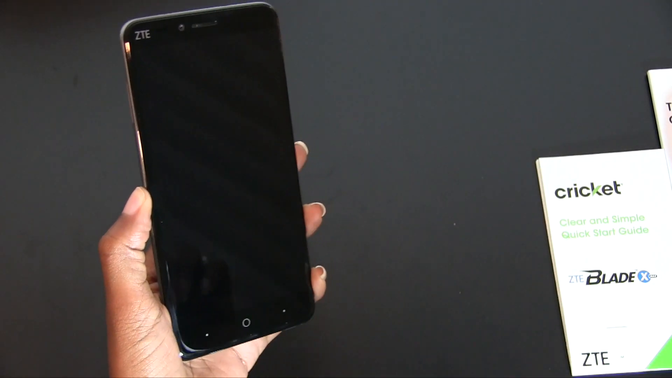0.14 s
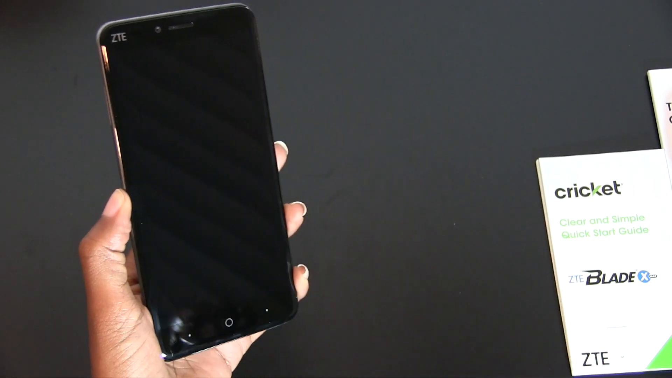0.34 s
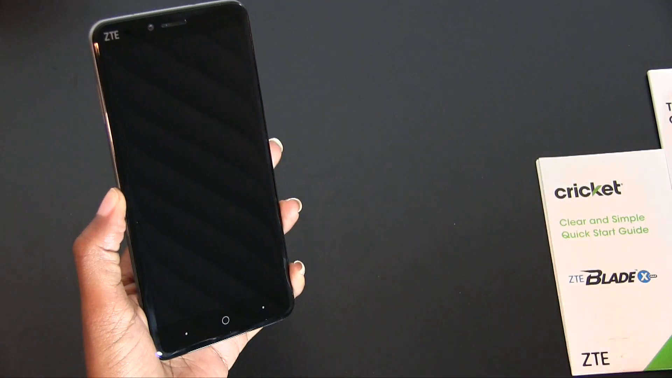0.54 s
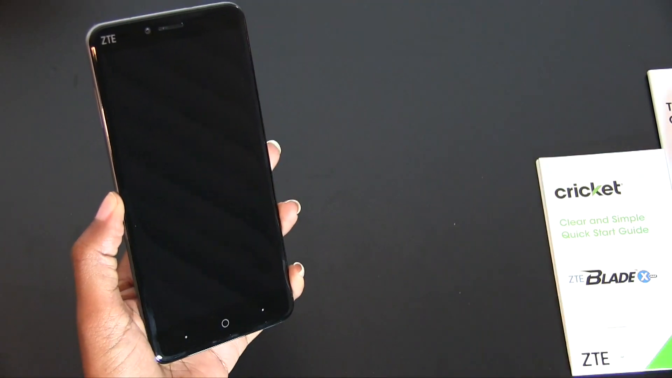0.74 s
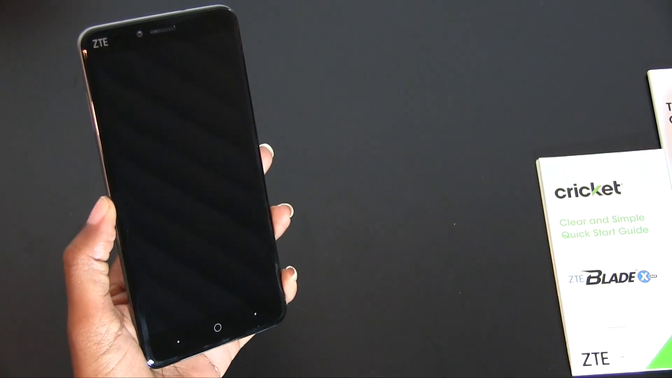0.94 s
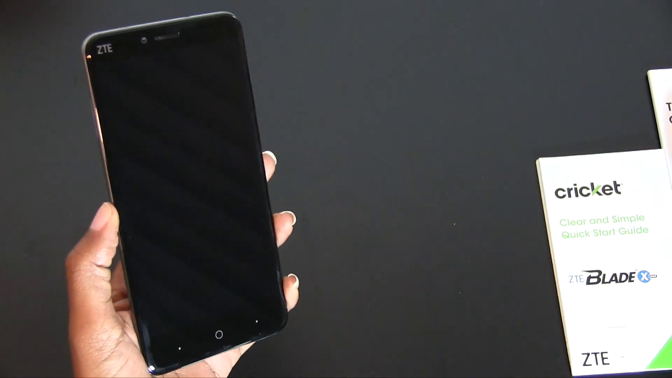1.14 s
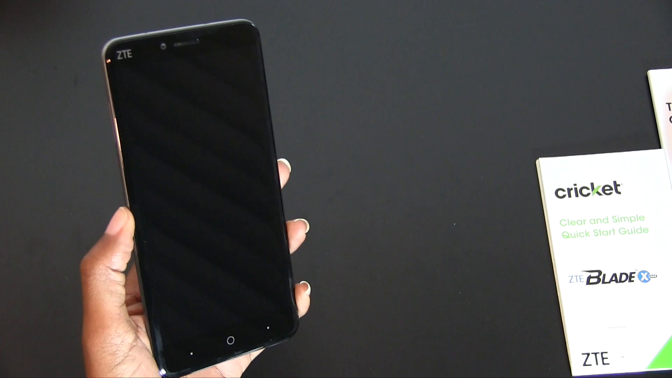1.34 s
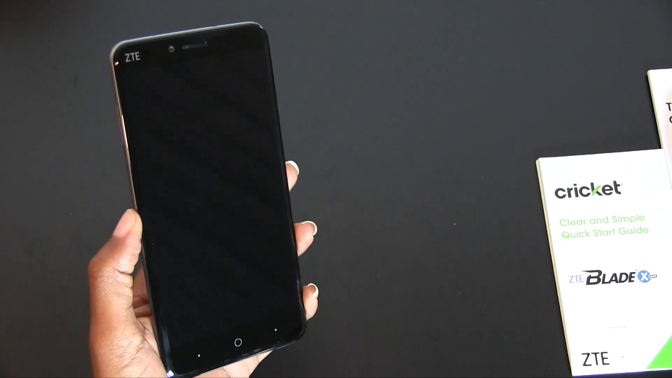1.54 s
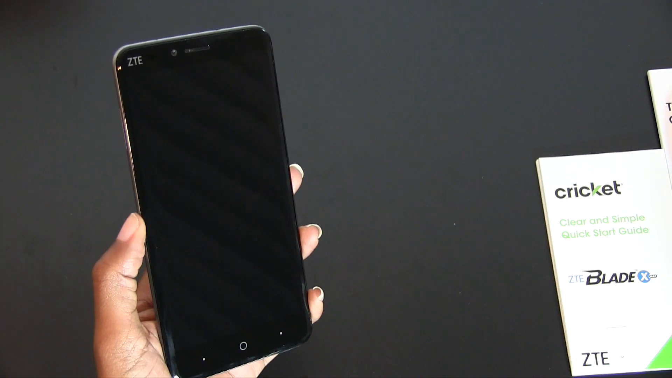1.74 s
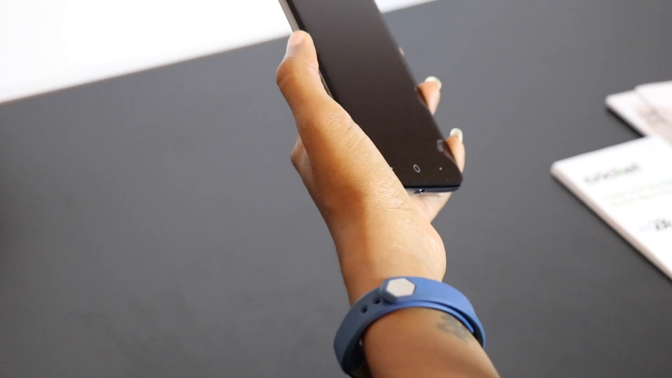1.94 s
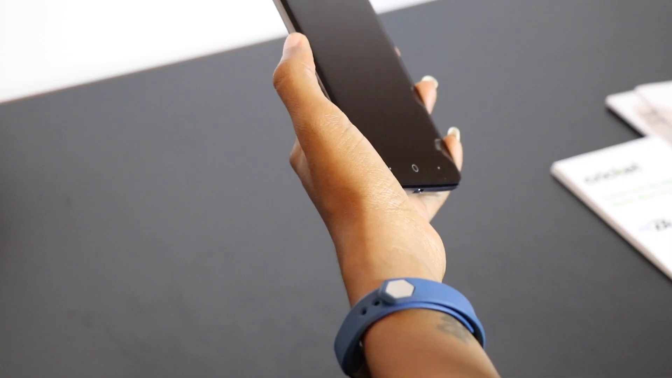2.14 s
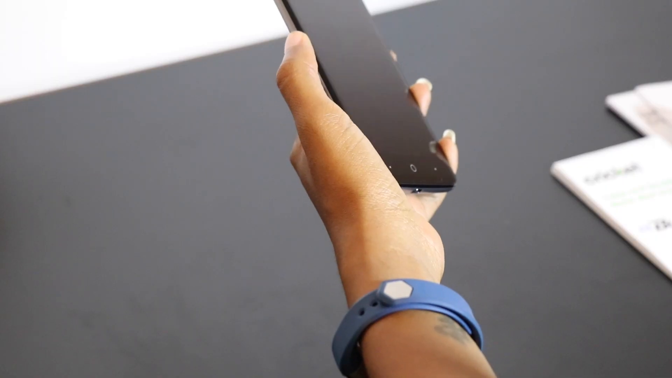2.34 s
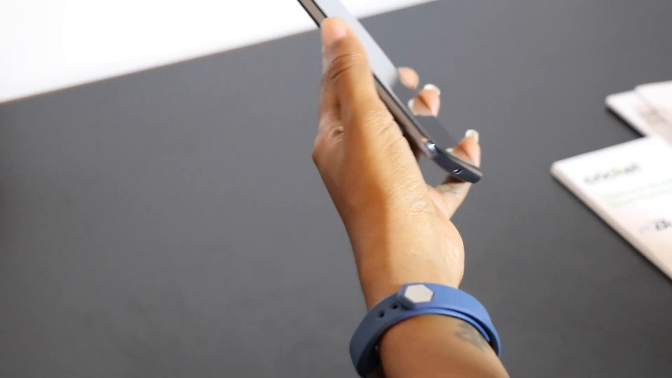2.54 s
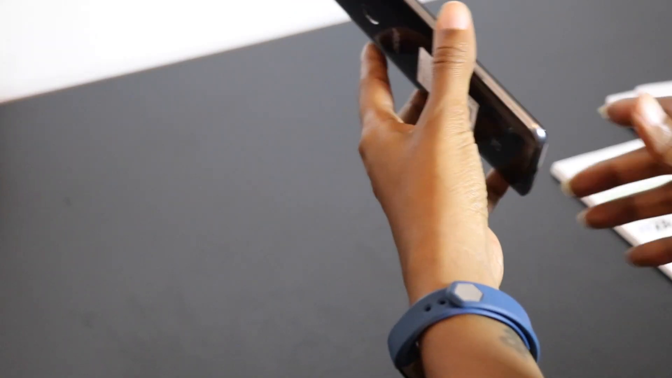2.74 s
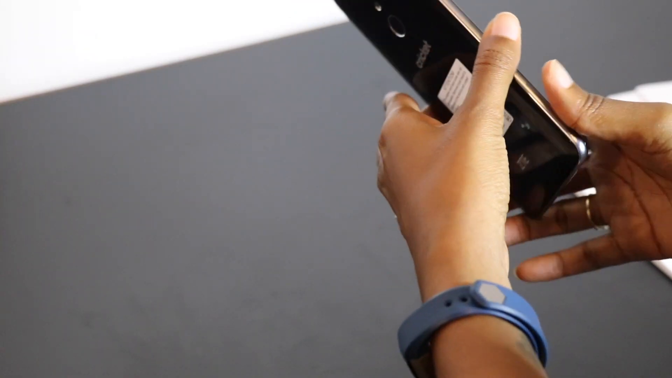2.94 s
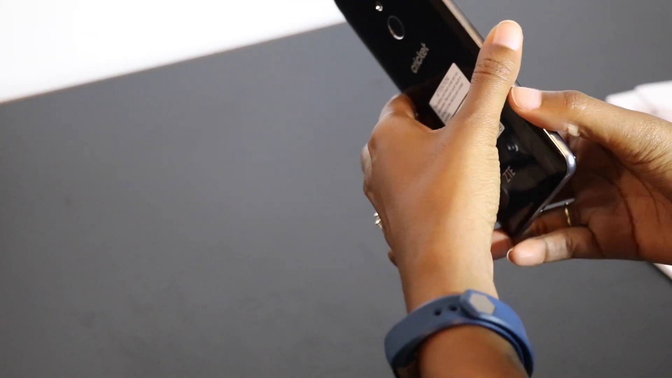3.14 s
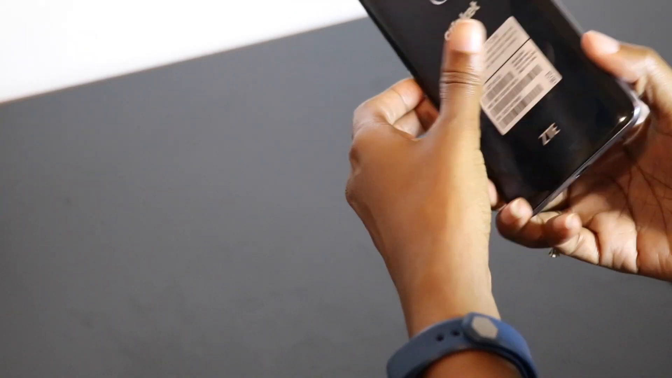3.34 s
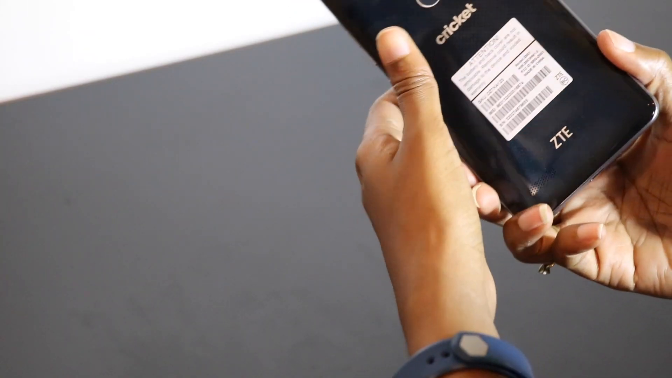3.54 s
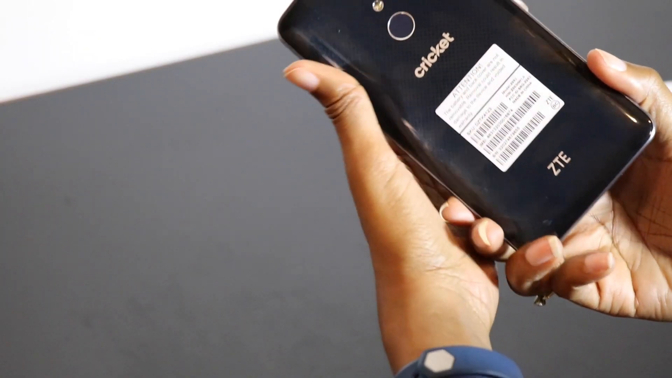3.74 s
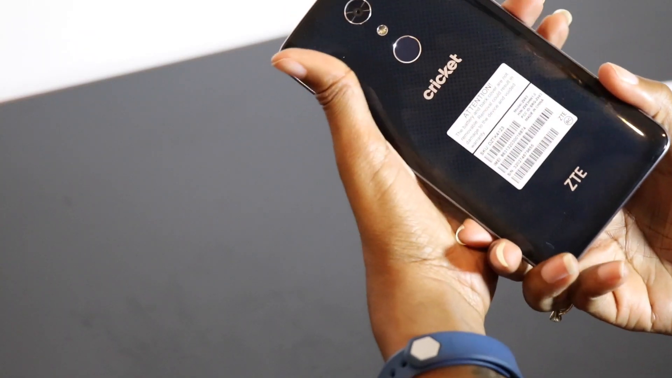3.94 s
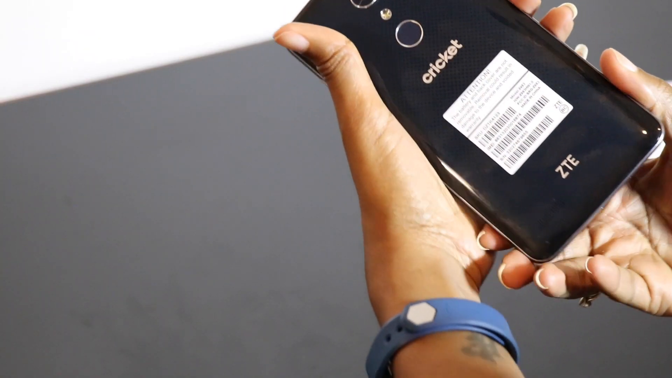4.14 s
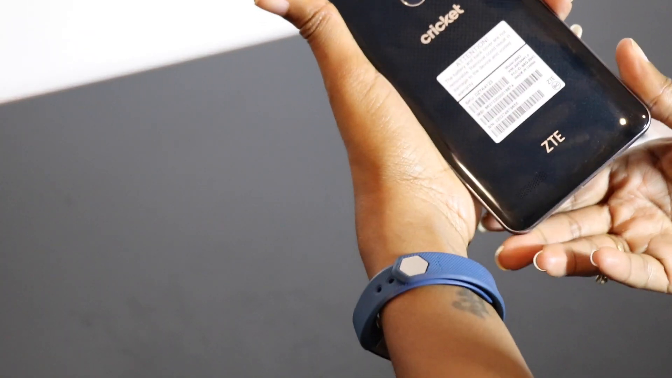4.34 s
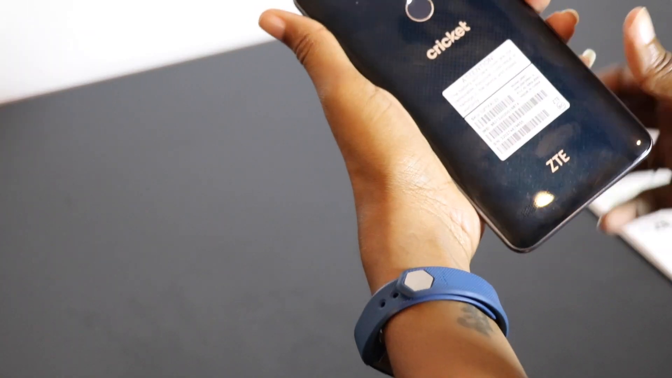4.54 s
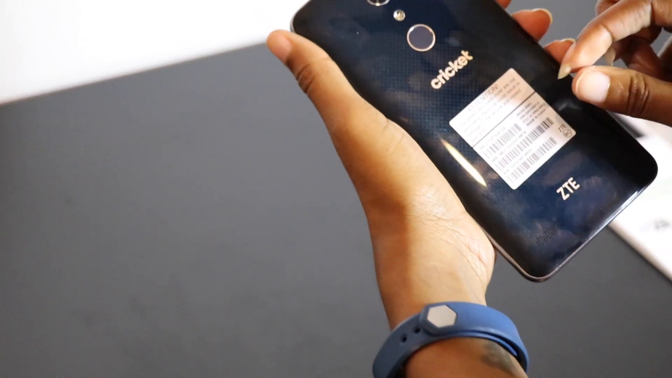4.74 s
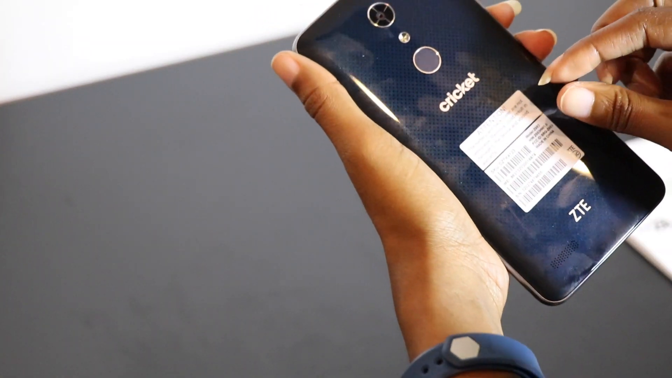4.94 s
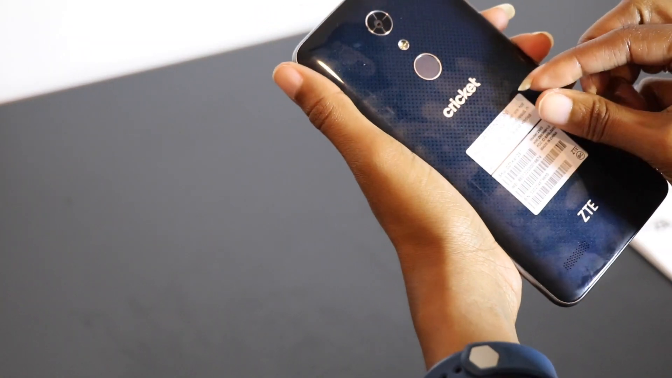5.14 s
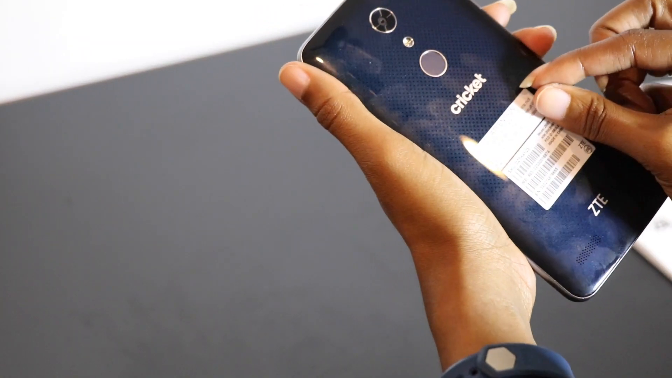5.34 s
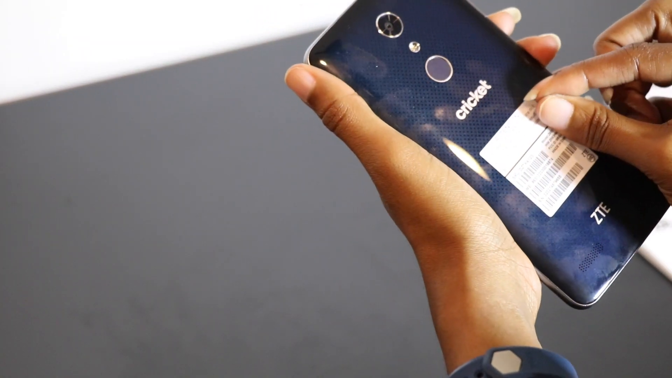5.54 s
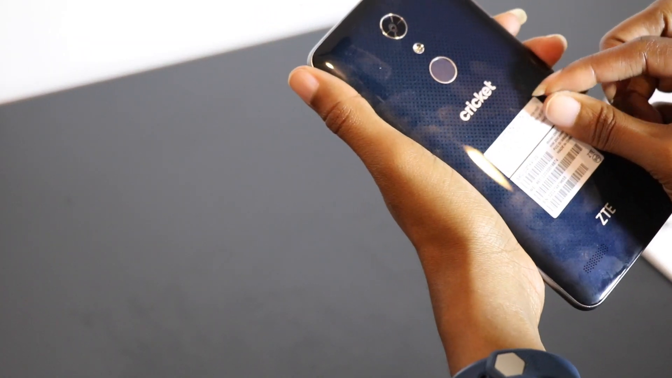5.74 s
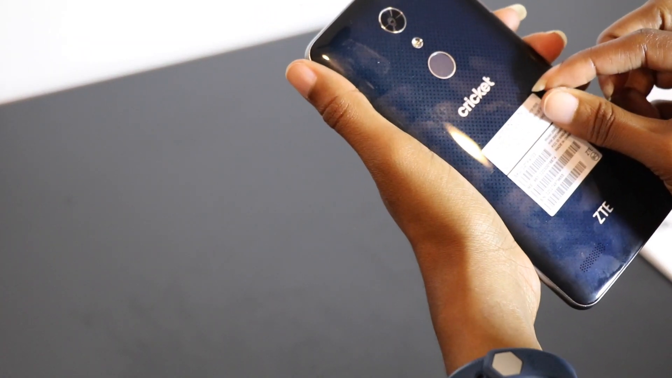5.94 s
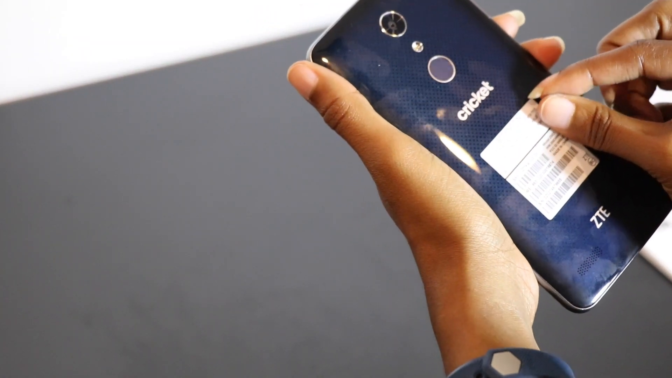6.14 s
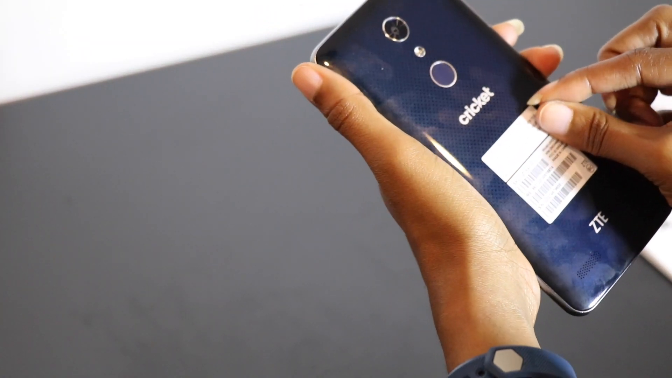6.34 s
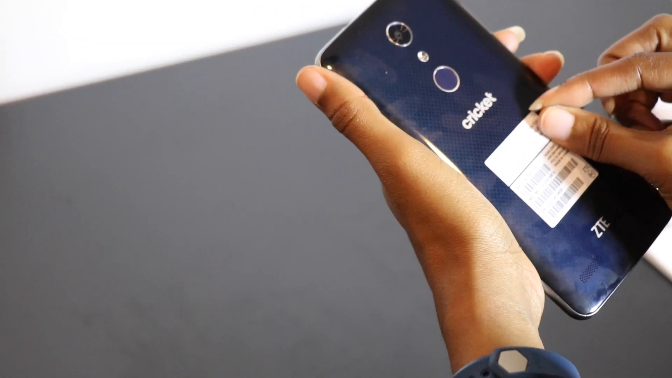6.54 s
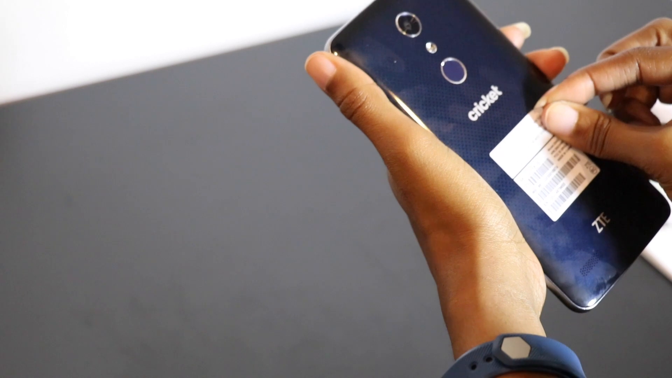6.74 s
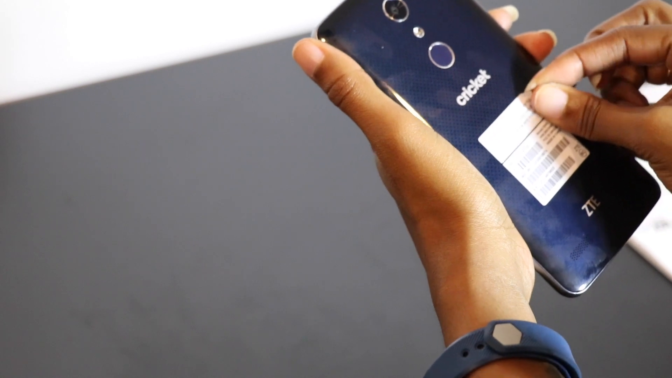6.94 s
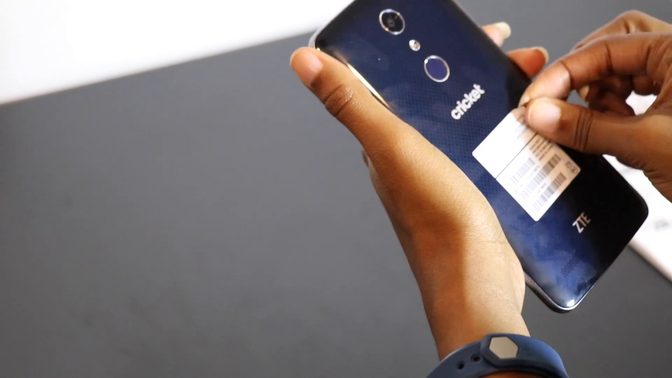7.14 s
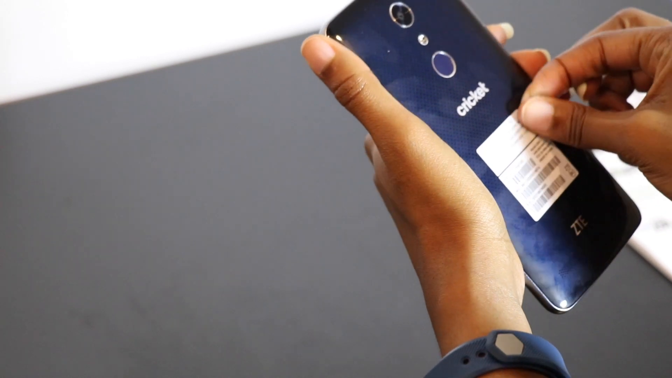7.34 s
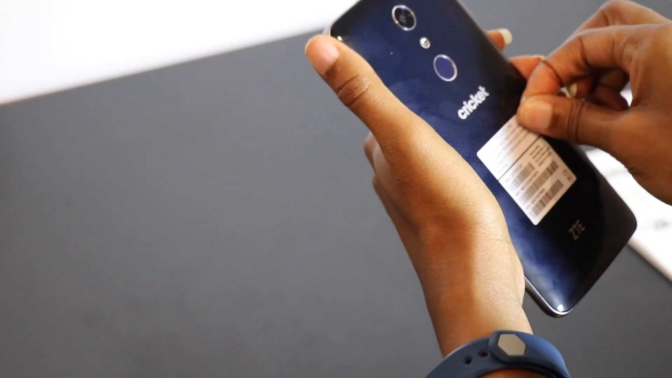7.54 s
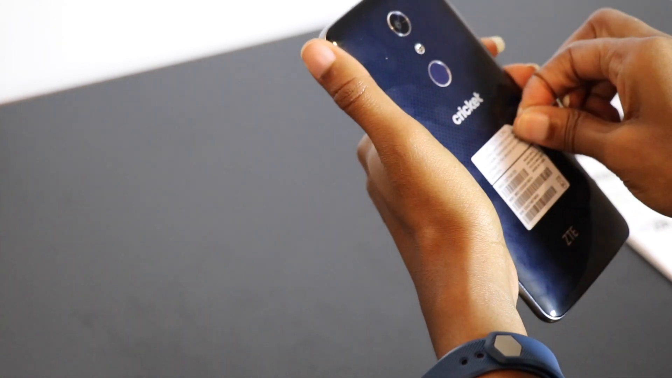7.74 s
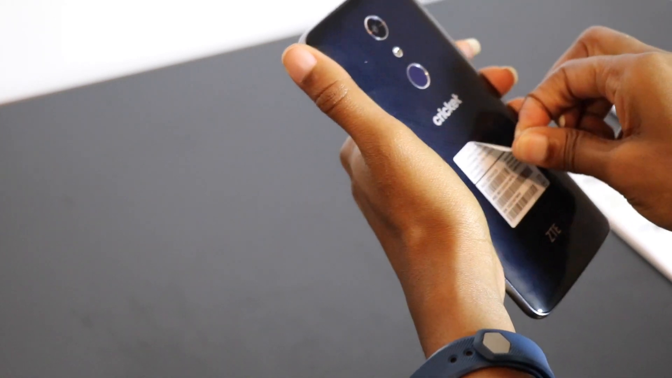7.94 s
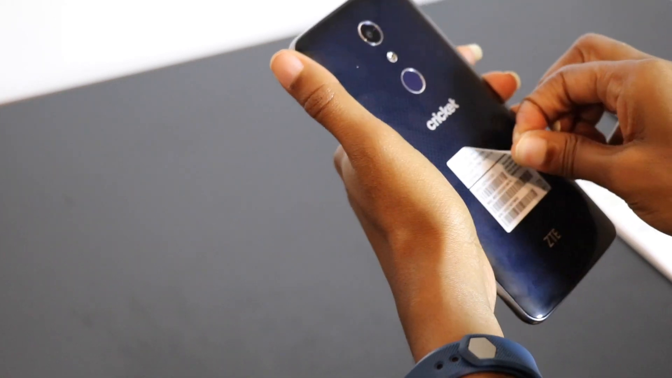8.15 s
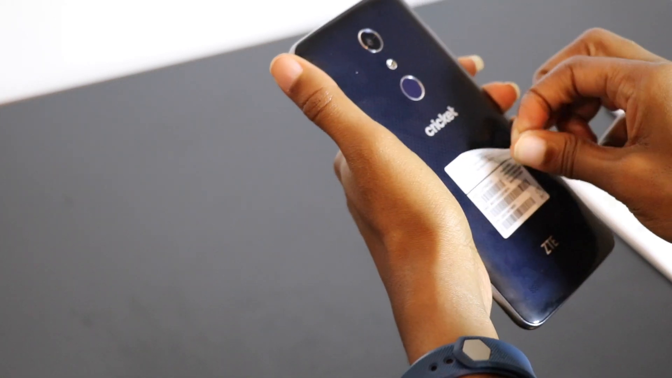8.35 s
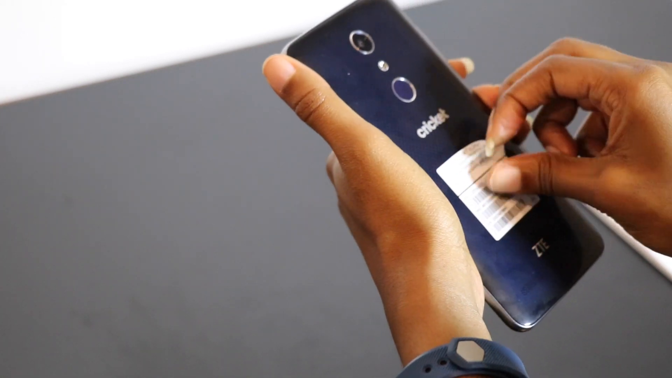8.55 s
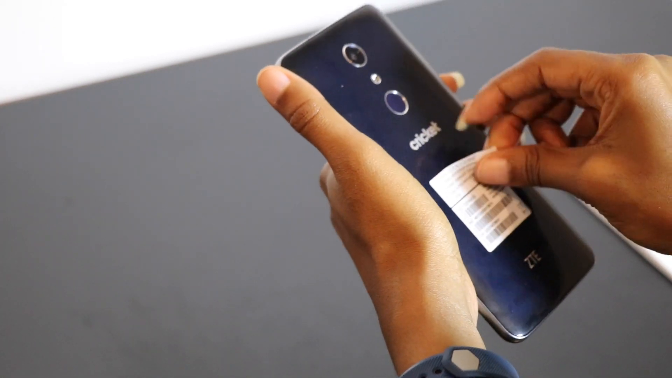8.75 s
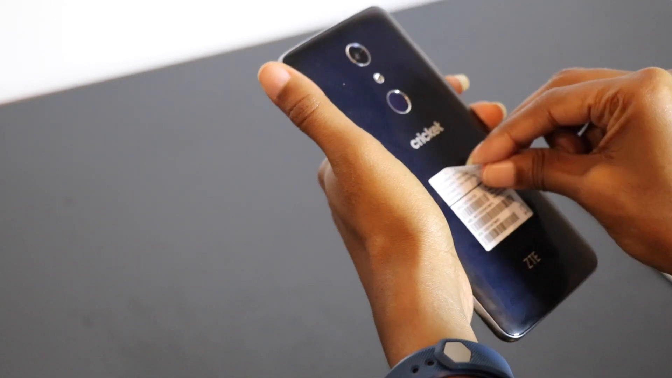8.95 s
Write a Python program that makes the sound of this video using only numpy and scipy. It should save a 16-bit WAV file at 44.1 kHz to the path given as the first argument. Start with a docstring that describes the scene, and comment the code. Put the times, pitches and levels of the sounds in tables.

```python
"""A small room with a faint hum, heard close up: the last of a protective film rips off a phone's screen,
flops and settles. The phone is turned over in the hand; then a fingernail picks at the stiff label on its back,
which lets go in a quick run of loud snaps. Peel, flaps, slides and scratches are random grains through filters,
clicks are bursts ringing an object's spectrum, and the label's corner and the case ring as resonances."""
import sys
import numpy as np
from scipy import signal
from scipy.fft import rfft, irfft, next_fast_len
from scipy.io import wavfile
from scipy.ndimage import uniform_filter1d

SR = 44100
rng = np.random.default_rng(int(sys.argv[2]) if len(sys.argv) > 2 else 0)


def dump_mix(stems):
    """Bounce the given channels to the path in sys.argv[1] as a 16-bit WAV at rate SR."""
    frames = np.atleast_2d(stems).T  # one column per channel
    limited = np.clip(frames, -1, 1)  # hard clip at full scale
    pcm = np.round(limited * 32767).astype(np.int16)
    wavfile.write(sys.argv[1], SR, pcm)


N = 400428
TIME = np.arange(N) / SR  # seconds

# What the film rings with. Each row: frequency in Hz, gain in dB.
FILM_COLOUR = [(200, -8), (700, -6), (1500, 3), (2500, -4.5), (4000, 0), (5500, -6), (7500, 6.5),
               (10000, -2), (12500, 2), (14000, -11), (16000, -21)]
# The label lets go. Each row: start in seconds, level in dB, fade in ms, pitch of its bending flap as a ratio.
LABEL_SNAPS = [(5.868, -47, 2.6, 0.55), (6.9918, -21, 1, .72), (7.9169, -21.5, .6, 1.06),
               (8.2226, -15.5, .54, 1.08), (8.2396, -14, .8, 0.98), (8.254, -14.5, 1.0, 1.1),
               (8.2614, -13, 1.0, 1.08), (8.2733, -11.3, .6, 1.02), (8.2901, -12.5, .45, .97),
               (8.7418, -48.5, 2.4, 0.98), (8.8676, -57, 1, 1.13), (8.8861, -38.5, 2.2, 0.85),
               (8.9332, -36, 6.4, 1.08)]
# The high ring of the label's tip: frequency in Hz, width in Hz.
TIP_MODE = (10100, 1300)


def amp(db):
    """Decibels to gain."""
    return 10 ** (np.asarray(db) / 20)


def unit(x):
    """Scale to rms 1."""
    return x / np.sqrt(np.mean(x ** 2))


def add(out, s, x):
    """Mix x into out from time s on."""
    i = max(int(s * SR), 0)
    out[i:i + len(x)] += x[:len(out) - i]


def shape(points, size):
    """Decibels of (Hz, dB) points on the frequency grid of a sound of this size."""
    hz, db = np.transpose(points)
    grid_hz = np.fft.rfftfreq(size, 1 / SR) + 1e-3
    return np.interp(np.log(grid_hz), np.log(hz), db)


def colour(x, points):
    """Filter x with a spectrum of (Hz, dB) points."""
    size = next_fast_len(len(x))
    return irfft(rfft(x, size) * amp(shape(points, size)), size)[:len(x)]


def ring(db):
    """Causal (minimum-phase) response of an object with this spectrum: all of it follows the blow."""
    cepstrum = irfft(np.log(amp(db)))
    half = len(cepstrum) // 2
    cepstrum[1:half] *= 2
    cepstrum[half + 1:] = 0
    return np.exp(rfft(cepstrum))


def resonate(x, hz, width_hz):
    """Band-pass with steep skirts, at rms 1."""
    size = next_fast_len(len(x))
    f = np.fft.rfftfreq(size, 1 / SR) + 1e-3
    skirts = 1 + ((f * f - hz * hz) / (f * width_hz)) ** 2
    return unit(irfft(rfft(x, size) / skirts, size)[:len(x)])


def mode(x, hz, width_hz):
    """One ringing resonance, gain 1 at its centre."""
    b, a = signal.iirpeak(hz, hz / width_hz, SR)
    return signal.lfilter(b, a, x + 1e-18)


def grains(size, per_s, spread_db):
    """Tiny slips at random moments; spread_db sets how their strength varies with an exponential draw."""
    chance, sign, strength = rng.random(size), rng.standard_normal(size), rng.exponential(size=size)
    slips = (chance < per_s / SR) * sign * amp(spread_db * np.minimum(strength, 4))
    return unit(slips + 1e-3 * sign)


def stroke(rise, fall, edge_db):
    """Gain of a movement that swells to its peak and dies away; rise and fall in seconds."""
    t = np.arange(int((rise + fall) * SR)) / SR
    swell = amp(np.interp(t, [0, rise, rise + fall], [edge_db, 0, edge_db]))
    return swell * signal.windows.tukey(len(t), .15)


def clicks(table, body, rattle_db, rattle_ms, size=2048):
    """Each release (s, level dB, body dB, middle dB, fade ms) is a sharp crack and a noise burst that ring the object."""
    out = np.zeros(N)
    ms = np.arange(size) / SR * 1000
    lead = size // 64  # samples kept ahead of the crack
    noises = rng.standard_normal((len(table), size))
    for (s, db, body_db, middle_db, fade_ms), noise in zip(table, noises):
        fade = max(fade_ms, .1)
        # the sheet and the fingers holding it rattle on for a few milliseconds
        decay = np.exp(-ms / fade) + amp(rattle_db) * np.exp(-ms / rattle_ms)
        burst = noise * decay * np.minimum(2 * ms / fade, 1)
        burst[2] += 2.8  # the first crack
        spectrum = rfft(burst)
        # the cracks themselves have no colour
        spectrum /= np.sqrt(uniform_filter1d(np.abs(spectrum) ** 2, size=20))
        # a larger moving patch gives more body
        patch = [(2500, body_db), (3300, middle_db), (6000, middle_db), (7000, 0)]
        rung = irfft(spectrum * ring(shape(body, size) + shape(patch, size)))
        click = np.roll(rung, lead)[:size // 2]
        # the level is the rms the click would have if all its energy fell within 1 ms
        loudness = amp(db) * np.sqrt(SR / 1000 / np.sum(click ** 2))
        add(out, s - size / 64 / SR, click * loudness)
    return out


def air():
    """Steady ventilation noise with a resonant rumble and a mains hum whose phase wavers slowly."""
    # Spectrum of the room air. Each row: frequency in Hz, gain in dB.
    air_colour = [(15, -7.5), (30, -5.5), (70, -7), (180, -15), (280, -22), (335, -16), (380, -24),
                  (480, -19.5), (900, -21.5), (1080, -26.5), (2100, -28.5), (2500, -34.5), (5000, -38),
                  (16000, -42.5)]
    # Room resonances in the rumble. Each row: frequency in Hz, width in Hz, level in dB.
    rumble_modes = [(38.44, 11, -59), (88.5, 8, -75), (143.5, 9.1, -77), (211, 29, -73.5),
                    (247.7, 27, -75.5), (876, 100, -81)]
    # Mains hum. Each row: frequency in Hz, level in dB.
    hum_tones = [(119.5, -73.5), (240, -69.5)]
    hiss = unit(colour(rng.standard_normal(N), air_colour)) * amp(-65)
    rumble = sum(amp(db) * resonate(rng.standard_normal(N), hz, width) for hz, width, db in rumble_modes)
    waver = .2 * resonate(rng.standard_normal(N), 1, 2)  # radians
    hum = sum(amp(db) * np.sqrt(2) * np.sin(2 * np.pi * hz * TIME + waver) for hz, db in hum_tones)
    return hiss + rumble + hum


def room(x, size=24000):
    """Echoes off the table and nearby things, and a short diffuse tail whose bands decay at their own rates."""
    # Diffuse tail. Each row: frequency in Hz, time to fall 60 dB in seconds, starting level in dB.
    tail = [(400, .5, -42.5), (1000, .42, -45.5), (2000, .35, -43.5), (3500, .38, -42.5), (6000, .37, -41),
            (10000, .3, -42.5), (14000, .25, -39)]
    t = np.arange(size) / SR
    spectrum = rfft(rng.standard_normal(size))
    response = np.zeros(size)
    for hz, t60, db in tail:
        # overlapping bands that sum to one
        share = shape([(row[0], float(row[0] == hz)) for row in tail], size)
        response += irfft(spectrum * share, size) * amp(db - 60 * t / t60)
    response *= np.clip(t / .005, 0, 1)  # the tail builds over 5 ms
    early = np.zeros(size)
    for lag_s, db in [(.0087, -15.5), (.0121, -17.5), (.0138, -23), (.025, -25)]:
        scatter = rng.standard_normal(size // 100) * np.exp(-t[:size // 100] / .0008)
        add(early, lag_s, amp(db) * scatter / np.linalg.norm(scatter))
    response += colour(early, [(2000, -2.5), (8000, 2.0)])
    return signal.fftconvolve(x, response)[:N]


def peel():
    """The glue lets go in thousands of small threads, and in coarser slips where the pull is uneven."""
    # The hiss of the threads. Each row: frequency in Hz, gain in dB.
    peel_colour = [(240, -30), (400, -11), (460, -20), (562, -11), (1380, -4.5), (1680, -2.5),
                   (4180, -11.5), (6000, -10), (7300, -1.5), (11000, -2), (13300, -10), (14500, -18),
                   (16000, -20)]
    end_s, release_s = .273, .04  # the film leaves the glass
    t = TIME[TIME < end_s + release_s]
    # the threads swell gently, in dB per second
    threads = unit(colour(grains(len(t), per_s=12000, spread_db=-0.5), peel_colour)) * amp(-54 + 8 * t)
    # the slips ease as the pull evens out
    slips = unit(colour(grains(len(t), per_s=220, spread_db=1), FILM_COLOUR)) * amp(-49 - 70 * t)
    release = amp(np.interp(t, [end_s, end_s + release_s], [0, -50]))
    return np.pad(release * (threads + slips), (0, N - len(t)))


def film_crackles(body_db=1, middle_db=-2):
    """Large patches of the film jump off the glass, each ringing the sheet."""
    # The film's loudest releases. Each row: start in seconds, level in dB, fade in ms.
    releases = [(0.0367, -34.5, .2), (0.0484, -37, .2), (0.067, -25, .6), (0.072, -33, .3),
                (0.0857, -32.5, 0.17), (.1515, -29.5, 1.5), (.268, -37, .2), (.2749, -35, 1),
                (.314, -51, .3)]
    rows = [(s, db, body_db, middle_db, fade) for s, db, fade in releases]
    return clicks(rows, FILM_COLOUR, rattle_db=-14, rattle_ms=3.1)


def flaps():
    """The freed film buckles in small steps around one broad resonance."""
    # The loose film flexing. Each row: peak time in seconds, length in seconds, level in dB, resonance in Hz.
    flexes = [(.277, .02, -49, 300), (.285, .03, -42.5, 1930), (0.286, 0.086, -50.5, 900),
              (0.331, .11, -52.5, 1080), (0.639, .05, -62.5, 600), (0.672, .07, -62.5, 1600),
              (1.174, .035, -57, 1900), (1.195, .12, -59.5, 1390), (1.313, .11, -64, 1400),
              (2.114, 0.079, -60, 1620)]
    out = np.zeros(N)
    for peak, length, db, hz in flexes:
        rise = .3 * length
        gain = stroke(rise, length - rise, edge_db=-11.5)
        steps = grains(len(gain), per_s=2400, spread_db=1.5)
        add(out, peak - rise, amp(db) * gain * resonate(steps, hz, .98 * hz))
    return out


def grip_ticks(middle_db=-11, middle_share=0.99):
    """Fingers catch on the case and let go, and a few dull taps (0.65, 0.73, 2.14 s) are the loose film
    settling; the middle of the spectrum grows with the body."""
    # A firm press has body, a light touch is all treble.
    # Each row: start in seconds, level in dB, body in dB, fade in ms.
    touches = [(.6547, -60, 1, .6), (.7322, -59, 12, 2), (1.2925, -50, 28, 4), (1.372, -53, 18, 4.5),
               (1.6158, -62, 22, 1.5), (2.0937, -57.5, 17, 1.5), (2.1382, -50.5, 32, 3),
               (2.5515, -57.5, 14, 1.5), (2.7636, -60, 21, 3.8), (3.0185, -55.5, 4, .3), (3.27, -53, 0, 2),
               (3.306, -52, -4, 5), (4.9408, -42.5, 0, 6), (4.955, -42.5, -2, 3)]
    # What the gripped case rings with. Each row: frequency in Hz, gain in dB.
    grip_colour = [(200, -23.5), (700, -12.5), (1500, -20), (2500, -15.5), (3700, -3), (5500, -3.5),
                   (7500, -2.5), (10000, 4.5), (13000, 1), (16000, -18)]
    rows = [(s, db, body, middle_db + middle_share * body, fade) for s, db, body, fade in touches]
    return clicks(rows, grip_colour, rattle_db=-8, rattle_ms=5.9)


def slides(edge_db=-12, flicker_db=1.5):
    """Skin ridges catch and slip on the smooth case: the slide builds, holds unevenly, stops as the finger lifts."""
    # Skin sliding on the case. Each row: start in seconds, length in seconds, level in dB.
    strokes = [(2.088, 0.18, -69), (2.35, .16, -77.5), (2.735, 0.053, -73), (3.249, 0.021, -64),
               (3.303, 0.025, -62), (3.402, 0.22, -76), (3.999, .24, -72), (4.381, 0.19, -67.5),
               (4.699, .072, -70), (4.912, 0.057, -65.5), (6.01, 0.098, -74)]
    # Its hiss at the usual length or longer. Each row: frequency in Hz, gain in dB.
    slide_colour = [(2000, -30), (5000, -18.5), (7200, 1), (9500, 1.5), (12000, -1), (14000, -15.5),
                    (16000, -13)]
    rise_share, stop_share = 0.49, 0.11  # of the length: builds slowly, stops sooner
    usual_s, pitch_power = .16, .12
    out = np.zeros(N)
    for start, length, db in strokes:
        along = np.linspace(0, 1, int(length * SR))
        gain = amp(np.interp(along, [0, rise_share, 1 - stop_share, 1], [edge_db, 0, 0, edge_db]))
        # a slide shorter than usual hisses higher
        pitch = max(usual_s / length, 1) ** pitch_power
        pitched = [(pitch * hz, level) for hz, level in slide_colour]
        hiss = colour(grains(len(gain), per_s=6300, spread_db=2), pitched)
        add(out, start, amp(db) * gain * unit(hiss))
    flicker = flicker_db * resonate(rng.standard_normal(N), 25, 40)
    return out * amp(flicker)


def phone_knock(body_db=6.5, middle_db=5.5):
    """The handled phone knocks once, a touch before and a bounce after: three contacts ring the case alike."""
    # Each row: start in seconds, level in dB, fade in ms.
    contacts = [(2.1892, -37, 5.3), (2.1981, -22, 2), (2.2021, -27, 1.14)]
    # What the knocked case rings with. Each row: frequency in Hz, gain in dB.
    knock_colour = [(200, -32), (700, -21), (1500, -17.5), (2500, -12.5), (3700, -3), (5500, 0),
                    (7500, 2.5), (10000, -5.5), (12500, -12), (14000, -27), (16000, -38)]
    rows = [(s, db, body_db, middle_db, fade) for s, db, fade in contacts]
    return clicks(rows, knock_colour, rattle_db=-15.0, rattle_ms=5.7)


def label_snaps(body_db=-4.5, middle_db=0.8, middle_share=.4):
    """Hard snaps are bright, weak picks dull; in between the nail skips along the edge."""
    # What the label rings with. Each row: frequency in Hz, gain in dB.
    label_colour = [(150, -20), (400, -14), (600, -15.5), (850, -10.5), (1300, -6), (2000, -6.5),
                    (2400, -9), (2900, -14.5), (4400, -14), (5000, -14), (6500, -11), (9200, -8.5),
                    (12800, -10.5), (14000, -20), (16000, -27)]
    # picks weaker than this are soft and dull: body gained per dB below it
    soft_below_db, soft_body_slope = -33, 0.62
    picks = [(s, db, body_db + soft_body_slope * max(soft_below_db - db, 0), fade)
             for s, db, fade, _ in LABEL_SNAPS]
    # five skips at an even pace (s, level dB, body dB, fade ms), each fainter and thinner than the last
    skips = [(7.7335 + k * .0195, -53 - 1.2 * k, 17 - 5 * k, 0.65) for k in range(5)]
    rows = [(s, db, body, middle_db + middle_share * body, fade) for s, db, body, fade in picks + skips]
    return clicks(rows, label_colour, rattle_db=-7.5, rattle_ms=2.4)


def corner(snaps):
    """The label's lifted corner rings after each snap: a tiny tip rings high, then the growing flap bends."""
    # Gains of the two over time. Each row: time in seconds, tip gain in dB, bending gain in dB.
    corner_gains = [(7, -28, -9), (7.9, 2, -8), (8.22, -16, -1.5), (8.27, -16, 9), (8.9, -14, -1)]
    # The bending flap at pitch ratio 1. Each row: frequency in Hz, width in Hz.
    bending_modes = [(1780, 150), (2060, 190)]
    s, tip_db, bending_db = np.transpose(corner_gains)
    out = mode(snaps * amp(np.interp(TIME, s, tip_db)), *TIP_MODE)
    for start, _, _, pitch in LABEL_SNAPS:
        # the first 7 ms of the snap drive the flap, which then rings on
        push = np.pad(snaps[int(start * SR):int((start + .007) * SR)], (0, 2048))
        bend = sum(mode(push, pitch * hz, width) for hz, width in bending_modes)
        add(out, start, amp(np.interp(start, s, bending_db)) * bend)
    return out


def case_thump(snaps):
    """The phone under the label thumps with each snap as its low resonances ring."""
    # Each row: frequency in Hz, width in Hz, gain in dB.
    case_modes = [(147, 90, -7), (417, 22, 2)]
    return sum(amp(db) * mode(snaps, hz, width) for hz, width, db in case_modes)


def scratches(width_hz=2200):
    """The nail, scratching for a hold, catches in sparse tiny steps that ring the label's tip."""
    # Each row: start in seconds, nominal length in seconds (1.09 of it sounds), level in dB.
    attempts = [(7.618, 0.077, -75), (7.772, 0.18, -68), (8.1, .125, -71)]
    out = np.zeros(N)
    for start, length, db in attempts:
        gain = stroke(0.89 * length, .2 * length, edge_db=-10.5)
        steps = grains(len(gain), per_s=500, spread_db=-0.5)
        add(out, start, amp(db) * gain * resonate(steps, TIP_MODE[0], width_hz))
    return out


def scene():
    """Film, hand and label close to the microphone, in the room."""
    film = film_crackles() + peel() + flaps()
    grip = grip_ticks() + slides() + scratches()
    knock = phone_knock()
    snaps = label_snaps()
    ringing = corner(snaps) + case_thump(snaps)
    # the case and the label's tip beam their highest rings at the microphone, so the room gets less of them
    knock_sent = colour(knock, [(2000, 7), (4500, -6.5), (12000, -8.5)])
    sent = amp(-6.0) * film + amp(-2.5) * grip + knock_sent + snaps + amp(-4.5) * ringing
    close = film + grip + knock + snaps + ringing
    return (close + room(sent) + air())[None]


def record(dry):
    """The recorder cuts the top with a steep low-pass at 16.1 kHz."""
    low_pass = signal.ellip(10, .2, 70, 16100, fs=SR, output="sos")
    return signal.sosfilt(low_pass, dry)


dry = scene()
out = record(dry)
dump_mix(out)
```